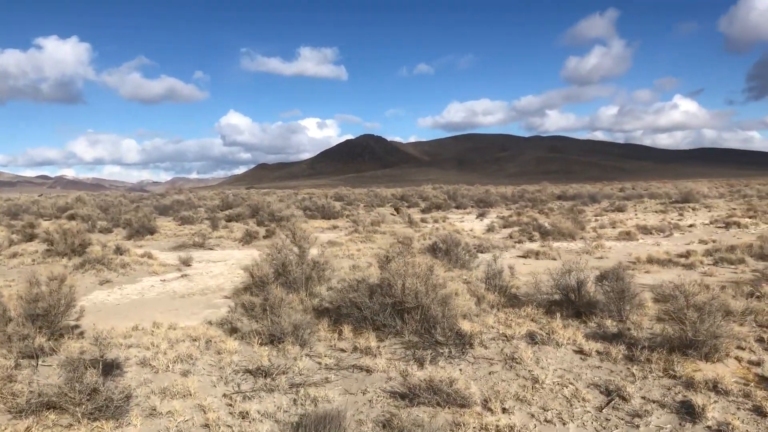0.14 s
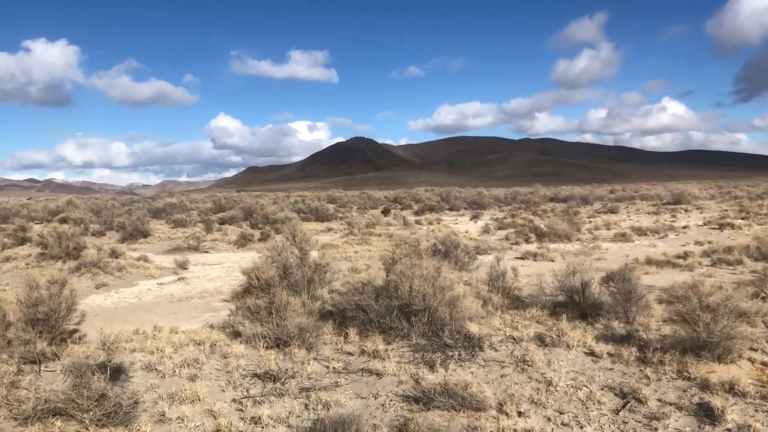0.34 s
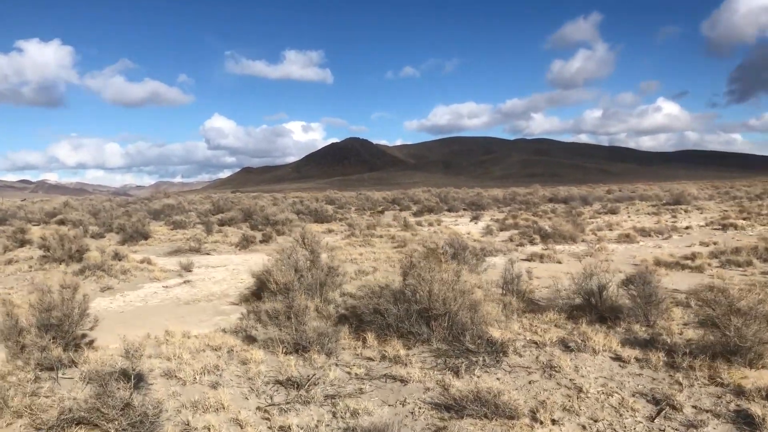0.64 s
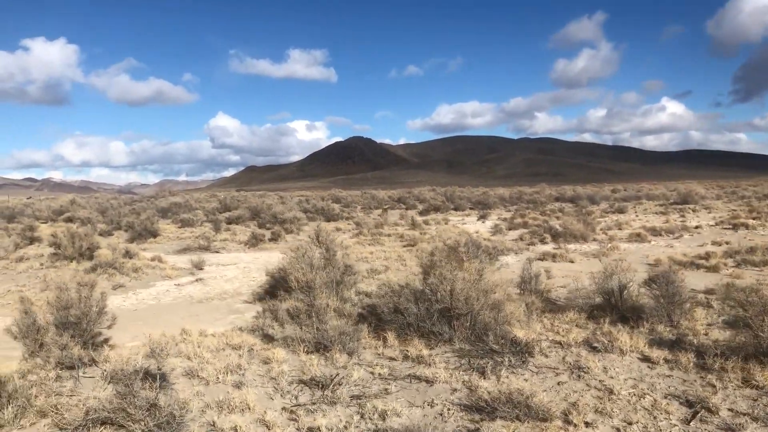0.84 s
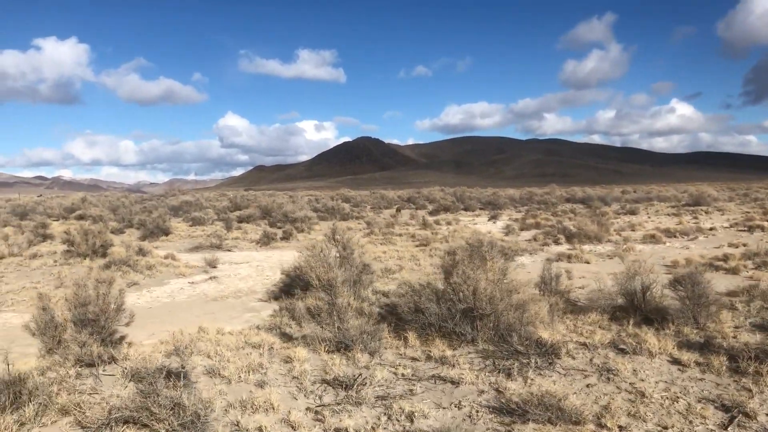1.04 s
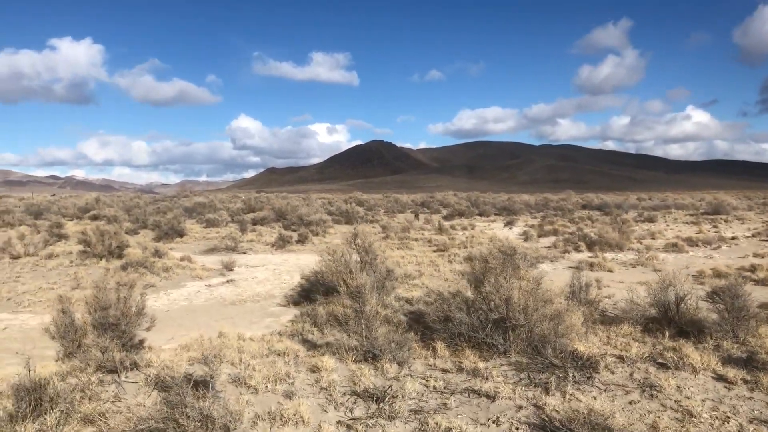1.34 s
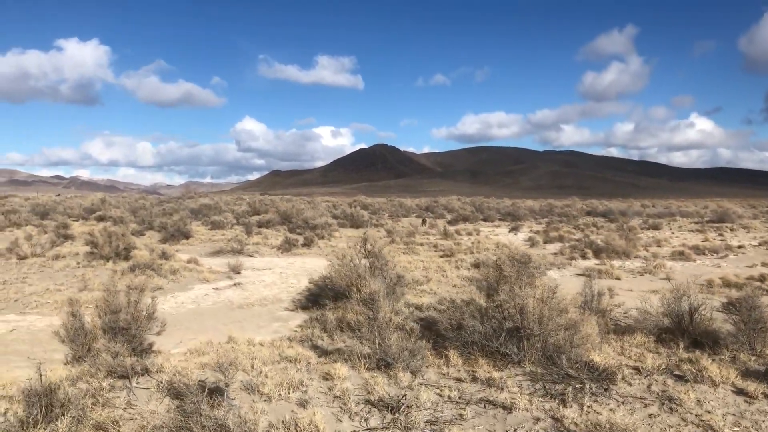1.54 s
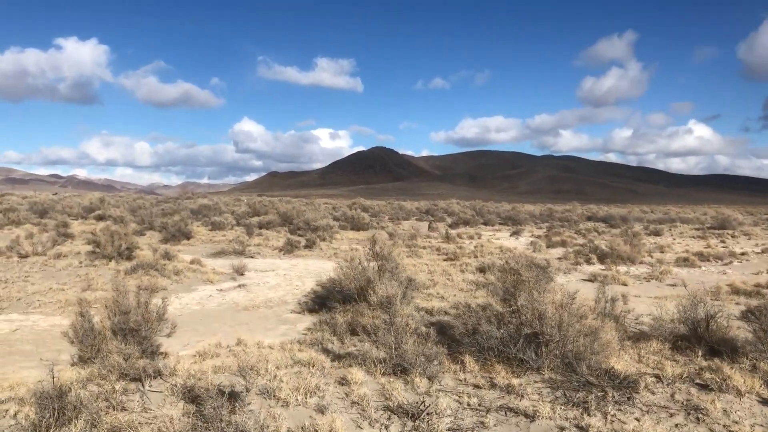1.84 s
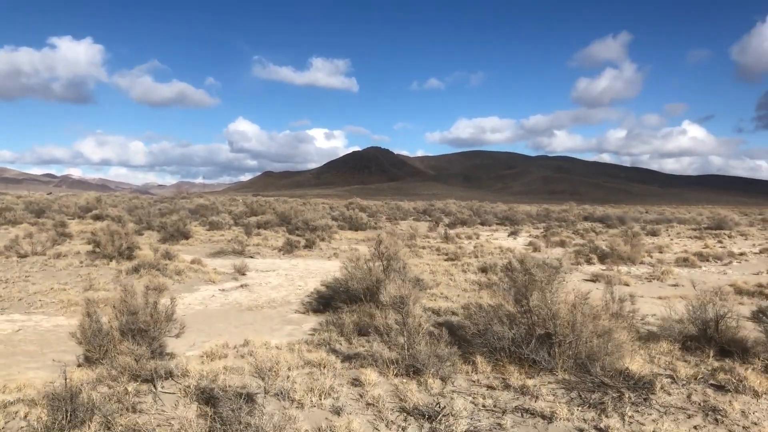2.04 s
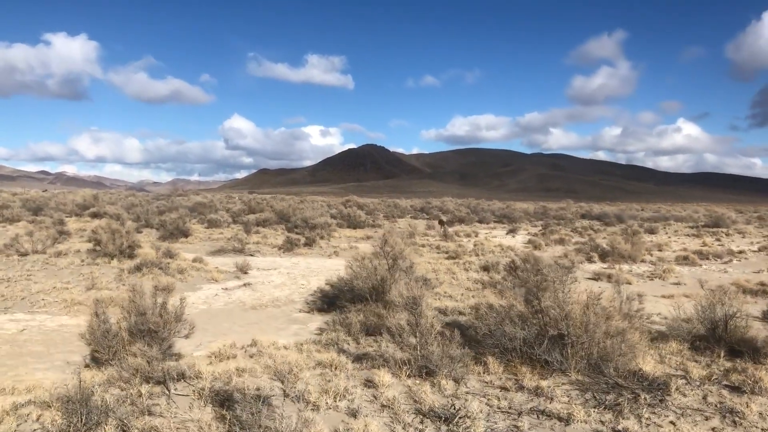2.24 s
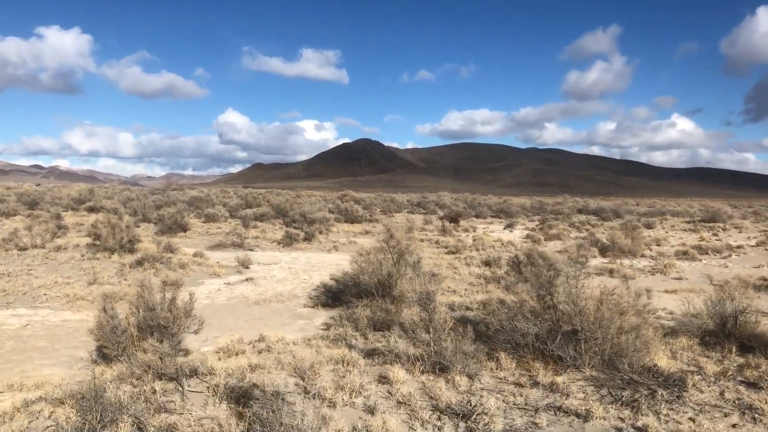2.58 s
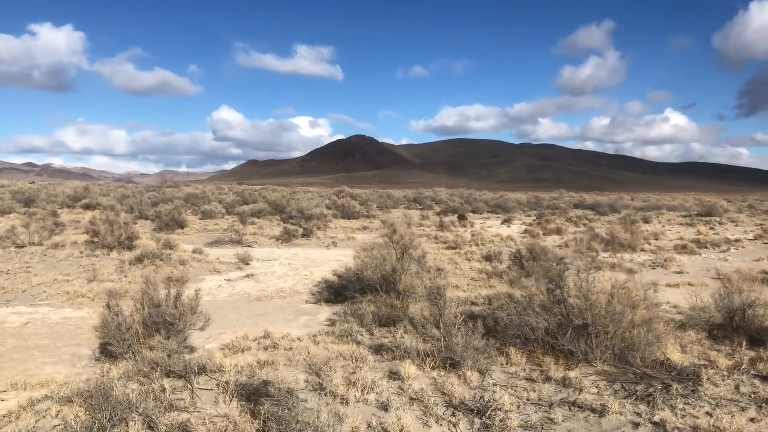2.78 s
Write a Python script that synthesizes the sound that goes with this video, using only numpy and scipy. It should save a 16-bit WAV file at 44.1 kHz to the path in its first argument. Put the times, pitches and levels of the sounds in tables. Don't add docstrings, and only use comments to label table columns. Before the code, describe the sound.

Rough wind noise thumps and rumbles on an exposed microphone in open desert, easing near the end

```python
import sys
import numpy as np
from scipy import signal
from scipy.fft import rfft, irfft
from scipy.io import wavfile
from scipy.ndimage import uniform_filter1d

SR = 44100
rng = np.random.default_rng(int(sys.argv[2]) if len(sys.argv) > 2 else 0)


def volts_from_db(level):
    exponent = np.asarray(level, float) / 20
    return 10 ** exponent


def bounce(signal):
    frames = np.transpose(np.atleast_2d(signal))
    limited = np.clip(frames, -1, 1)
    pcm = np.round(limited * 32767).astype(np.int16)
    wavfile.write(sys.argv[1], SR, pcm)


N = 130095
EDDY_HZ = 478.3


def unit(x):
    return x / np.sqrt(np.mean(x ** 2))


def coloured(points, lo_hz=0., hi_hz=1e5):
    freq_hz = np.maximum(np.arange(N // 2 + 1) * SR / N, 1)
    point_hz, point_db = np.array(points).T
    band_edge = 1 / (1 + (lo_hz / freq_hz) ** 4) / (1 + (freq_hz / hi_hz) ** 4)
    colour = volts_from_db(np.interp(np.log(freq_hz), np.log(point_hz), point_db))
    return irfft(rfft(rng.standard_normal(N)) * colour * band_edge, N)


def walk(rate_hz):
    hold = int(SR / rate_hz)
    held = np.repeat(rng.standard_normal(N // hold + 1), hold)
    slewed = uniform_filter1d(uniform_filter1d(held, hold), hold)
    return unit(slewed[:N])


def scatter(start_s, grains, lead=0):
    out = np.zeros(N + 2 * grains.shape[1])
    for start, grain in zip(start_s, grains):
        first = max(int(start * SR) - lead, 0)
        out[first:first + len(grain)] += grain
    return out[:N]


def double_peak(x, centre_hz, width_hz):
    b, a = signal.iirpeak(centre_hz, centre_hz / width_hz, fs=SR)
    return signal.lfilter(b, a, signal.lfilter(b, a, x))


def gust(column):
    # time_s [s], rumble_db [dB], small_eddy_db [dB]
    wind = np.array([(0.0, -25.5, -39), (0.1, -44, -35), (0.32, -28.5, -39), (0.349, -44, -35.5),
                     (0.45, -23, -37.5), (0.54, -31, -47), (0.75, -24, -40.5), (0.821, -31, -53),
                     (0.99, -24.5, -38), (1.171, -18.5, -30), (1.31, -24.5, -33), (1.72, -28, -42),
                     (2.291, -30.5, -41.5), (2.51, -29.5, -41.5), (2.589, -42.5, -47.5),
                     (2.698, -31, -39.5), (2.729, -34, -72), (2.95, -34, -54)])
    return volts_from_db(np.interp(np.arange(N) / SR, wind[:, 0], wind[:, column]))


def eddies(start_s, peak, hz):
    rise_s, fade_s, slow_s = .002, 0.0063, 0.01
    slow_share = 0.427
    fine_fade, ripple_fall_db, ripple_knee = 0.34, -18, 2.226
    t = np.arange(2048) / SR
    stretch = (EDDY_HZ / hz[:, None]) ** .5
    slowing_s = slow_s * stretch
    fast_travel = (1 - slow_share) * slowing_s * (1 - np.exp(-t / slow_s / stretch))
    travel = hz[:, None] * (slow_share * t + fast_travel)
    chance = rng.random((len(hz), 24))
    wave = 0
    for k in range(12):
        ratio = (.33 * 1.33 ** (k + chance[:, k]))[:, None]
        level = volts_from_db(ripple_fall_db * np.log2(1 + (ratio / ripple_knee) ** 2)) * ratio ** .8
        fade = np.exp(-t * (1 + fine_fade * ratio) / fade_s / stretch)
        phase = 2 * np.pi * (ratio * travel + chance[:, 12 + k, None])
        wave = wave + level * fade * np.cos(phase)
    onset = (1 - np.exp(-(t / rise_s) ** 2)) ** 2
    tail = np.cos(np.pi / 2 * t / t[-1]) ** 2
    wave = wave * onset * tail
    wave = wave / np.abs(wave).max(axis=1, keepdims=True)
    return scatter(start_s, wave * peak[:, None], lead=int(rise_s * SR))


def buffets():
    # start_s [s], peak_db [dB], sharpness_db [dB]
    strong = [(0.05, -43, -16), (0.069, -27, -12.5), (0.107, -24, -21.5), (0.125, -28.5, -25.5),
              (0.147, -24, -29.5), (0.231, -23, -20), (0.273, -19, -29.5), (0.345, -27.5, -31.5),
              (0.368, -33.5, -22.5), (0.401, -24, -24.5), (0.462, -24, -34.5), (0.551, -39, -32.5),
              (0.637, -23, -33), (0.704, -29.5, -26), (0.776, -19.5, -18.5), (0.904, -52, -31.5),
              (0.925, -18.5, -26.5), (0.964, -19, -27.5), (1.015, -25, -23.5), (1.054, -26.5, -23.5),
              (1.078, -15.5, -23.5), (1.099, -15, -21.5), (1.125, -16.5, -16.5), (1.16, -19, -21),
              (1.176, -14.5, -23.5), (1.229, -28, -16), (1.243, -17, -20), (1.298, -26.5, -18.5),
              (1.339, -20.5, -26), (1.379, -21, -24),
              (1.44, -17.5, -28), (1.477, -35, -15.5), (1.507, -17, -22), (1.526, -21.5, -23),
            (1.614, -42, -28), (1.634, -17.5, -20.5), (1.715, -21.5, -21.5), (1.763, -24.5, -33.5),
            (1.781, -22.5, -28), (1.804, -24.5, -24), (1.838, -27.5, -23.5), (1.856, -23.5, -25.5),
            (1.918, -22, -31.5), (1.95, -30, -25.5), (2.004, -22.5, -24.5), (2.042, -22, -24.5),
            (1.965, -30, -22.5), (2.108, -17, -24), (2.16, -22, -26.5), (2.197, -26, -26),
            (2.251, -27, -26), (2.325, -22, -25), (2.367, -16.5, -22), (2.389, -20.5, -19.5),
            (2.452, -30, -21.5), (2.476, -23.5, -24.5), (2.51, -18.5, -32), (2.628, -33, -28),
            (2.671, -26, -29),
              (0.137, -26.5, -21), (0.168, -30.5, -21), (0.241, -19.5, -23.5), (0.792, -26.5, -22.5),
             (0.836, -28, -27), (0.933, -18, -26.5), (0.951, -27, -23), (0.982, -39, -17.5),
             (1.029, -39, -13.5), (1.071, -15, -28), (1.088, -22.5, -15.5), (1.111, -16, -13),
             (1.129, -16.5, -19.5), (1.222, -23, -16), (1.274, -24.5, -19), (1.312, -22, -19),
             (1.351, -19.5, -23.5), (1.369, -29, -23), (1.531, -18, -20.5), (1.647, -21.5, -31.5),
             (1.657, -22, -24.5), (1.676, -36.5, -15.5), (1.845, -24, -24), (1.973, -25, -20.5),
             (1.99, -21, -35), (2.061, -25, -23.5), (2.119, -19.5, -32), (2.177, -23.5, -23),
             (2.202, -22.5, -29.5), (2.329, -29, -20.5)]
    # start_s [s], peak_db [dB], sharpness_db [dB]
    faint = [(0.012, -32.5, -22.5), (0.024, -38.5, -25.5), (0.196, -26.5, -22), (0.211, -29, -23),
             (0.255, -16.5, -25), (0.296, -17.5, -25.5), (0.309, -25, -25.5), (0.388, -29, -24.5),
             (0.424, -18, -28.5), (0.436, -39, -28), (0.494, -26, -24), (0.519, -44, -26),
             (0.563, -25, -27), (0.593, -25, -24), (0.614, -29, -26.5), (0.642, -20.5, -27.5),
             (0.659, -23, -26.5), (0.724, -26, -24), (0.739, -31, -28.5), (0.807, -21.5, -26),
             (0.848, -31, -22.5), (0.881, -42, -30), (0.987, -26, -31), (1.128, -33, -22.5),
             (1.147, -28, -25), (1.191, -31, -24), (1.386, -14, -24.5), (1.407, -20.5, -26.5),
             (1.422, -18.5, -27), (1.564, -50.5, -18.5), (1.76, -24.5, -25.5), (1.891, -38, -22.5),
             (2.026, -21.5, -22), (2.091, -21.5, -25.5), (2.23, -35, -23), (2.288, -34, -27),
             (2.301, -27, -25.5), (2.338, -19, -24.5), (2.353, -21.5, -22.5), (2.4, -19.5, -24.5),
             (2.416, -30, -28), (2.442, -21, -27.5), (2.488, -26, -24), (2.523, -29, -29),
             (2.538, -47, -17), (2.562, -35, -28), (2.58, -34, -27), (2.596, -25, -23), (2.629, -40, -24.5),
             (2.647, -27, -28), (2.682, -25, -26), (2.694, -27, -25.5), (2.726, -34, -28),
             (2.787, -50, -24), (2.805, -32.5, -26), (2.826, -42, -27), (2.862, -42, -25),
             (2.898, -59, -28), (2.915, -34, -25)]
    lag_s, gain_db, usual_sharp_db, speed_power = .001, 2.5, -23, 0.408
    softened = np.array(faint) + [0, -2, -8]
    start_s, peak_db, sharp_db = np.vstack([strong, softened]).T
    hz = EDDY_HZ * volts_from_db(sharp_db - usual_sharp_db) ** speed_power
    return eddies(start_s + lag_s, volts_from_db(peak_db + gain_db), hz)


def flutter():
    count, usual_hz, hz_spread = 400, 255.5, .3
    gain_db, scatter_db = 7, 1.5
    usual_gust_db, gust_speed_power = -39.5, .16
    place, size, speed = rng.random((count, 3)).T
    wind = gust(column=2)[(place * (N - 1)).astype(int)]
    gust_speed = (wind / volts_from_db(usual_gust_db)) ** gust_speed_power
    hz = usual_hz * gust_speed * np.exp(hz_spread * 3.4 * (speed - .5))
    peak = wind * volts_from_db(gain_db - scatter_db * np.log(size))
    return eddies(place * N / SR, peak, hz)


def rumble():
    # freq_hz [Hz], density_db [dB per Hz]
    low_spectrum = [(12, -39.5), (20, 8.5), (85, 10.5), (251, -3.5), (312, -5.5), (455, -9.5), (702, -15.5),
                    (1500, -51), (1950, -86.5), (3300, -120)]
    # freq_hz [Hz], density_db [dB per Hz]
    skirt_spectrum = [(200, -12.5), (400, 4.5), (700, -4), (1000, -25), (1500, -39), (2000, -54),
                      (3000, -74.5)]
    low_db, flicker_db = -1.5, 3
    skirt_db, throb_db = -10.5, 4.5
    low = np.zeros(N)
    for hz in (30, 60, 120, 240):
        flicker = volts_from_db(flicker_db * walk(hz / 8))
        low += flicker * coloured(low_spectrum, hz / 1.5, hz * 1.5)
    skirt = unit(coloured(skirt_spectrum))
    throb = volts_from_db(skirt_db + throb_db * walk(39.25))
    return unit(low) * gust(column=1) * volts_from_db(low_db) + skirt * gust(column=2) * throb


def cracks():
    # start_s [s], peak_db [dB]
    crack_table = [(0.071, -58.5), (0.778, -62), (1.080, -66), (1.089, -64), (1.111, -47), (1.126, -49),
                   (1.13, -48), (1.224, -68), (1.231, -66.5), (1.243, -54.5), (1.533, -58.5), (1.635, -61),
                   (1.718, -59.5), (2.366, -68), (2.392, -62.5)]
    start_s, peak_db = np.array(crack_table).T
    puff_s = .0005
    t = np.arange(200) / SR
    swell = np.exp(-((t - t[80]) / puff_s) ** 2)
    puff = double_peak(rng.standard_normal((len(start_s), len(t))) * swell, centre_hz=3200, width_hz=2100)
    puff = puff / np.abs(puff).max(axis=1, keepdims=True)
    return scatter(start_s, puff * volts_from_db(peak_db)[:, None], lead=60)


def ticks():
    # start_s [s], peak_db [dB], pitch_hz [Hz], ring_s [s to fall 60 dB]
    snaps = [(.069, -63, 11000, 0.0085), (0.508, -50.5, 8200, 0.023), (0.512, -46.5, 12000, 0.0081),
             (.518, -49.5, 9000, 0.017), (1.68, -65, 10500, .006), (1.803, -65.5, 10600, .03),
             (1.842, -58, 11000, 0.0087), (1.856, -60, 11000, 0.0089), (1.867, -84, 11000, .008),
             (1.880, -51, 10500, 0.012), (2.168, -59.5, 12000, .008), (2.341, -67, 8400, 0.027),
             (2.420, -55, 11500, 0.013), (2.436, -56, 12500, 0.022), (2.452, -50, 8500, 0.0087),
             (2.457, -67, 7600, 0.039), (2.489, -58, 12000, 0.013), (2.633, -61, 12000, 0.013),
             (2.645, -78.5, 11500, .006), (2.921, -58.5, 11000, .01)]
    start_s, peak_db, pitch_hz, ring_s = np.array(snaps).T[:, :, None]
    t = np.arange(3000) / SR
    noise = rng.standard_normal((len(start_s), len(t)))
    rough = uniform_filter1d(uniform_filter1d(noise, size=8, axis=1), size=8, axis=1) * 2.3
    noise_share = .6 * (ring_s < .025)
    onset = 1 - np.exp(-(t / 0.00026) ** 2)
    decay = np.exp(-t * np.log(1000) / ring_s)
    wave = (1 - noise_share + noise_share * rough) * np.sin(2 * np.pi * pitch_hz * t) * onset * decay
    return scatter(start_s[:, 0], volts_from_db(peak_db + 1.9 * (noise_share > 0)) * wave)


def brushes():
    # start_s [s], length_s [s], level_db [dB]
    rubs = [
        (0.422, .04, -77.5),
        (1.01, 0.038, -76),
        (1.529, 0.086, -79.5),
        (1.823, .09, -85),
        (2.534, 0.12, -76.5),
        (2.603, 0.13, -79),
        (2.701, 0.12, -95),
        (2.893, 0.09, -80.5),
    ]
    t = np.arange(N) / SR
    swell = np.zeros(N)
    for start_s, length_s, level_db in rubs:
        half_s = length_s / 2
        swell += volts_from_db(level_db) * np.exp(-((t - start_s - half_s) / half_s) ** 4)
    grit = rng.standard_normal(N) * volts_from_db(-3 * walk(400))
    return unit(double_peak(grit, centre_hz=11500, width_hz=4400)) * swell


def hiss():
    # freq_hz [Hz], density_db [dB per Hz]
    hiss_spectrum = [(900, 13), (1800, 2.5), (3000, -1), (6000, -5.5), (10000, -4.5), (12000, -2.5),
                     (14000, -13), (16000, -15)]
    return unit(coloured(hiss_spectrum, lo_hz=800.)) * volts_from_db(-74 + 1.0 * walk(13))


def scene():
    wind = buffets() + flutter() + rumble() + cracks()
    return (wind + ticks() + brushes() + hiss())[None]


def band_limit(x):
    return signal.sosfilt(signal.butter(12, 15750, fs=SR, output="sos"), x)


def record(dry):
    low_hz, limit = 53, .3
    run_in = 2000
    padded = np.pad(dry, ((0, 0), (run_in, 0)), "reflect")
    high_pass = signal.butter(3, low_hz, "high", fs=SR, output="sos")
    cut = signal.sosfilt(high_pass, padded)[:, run_in:]
    return band_limit(limit * np.tanh(cut / limit))


dry = scene()
out = record(dry)
bounce(out)
```